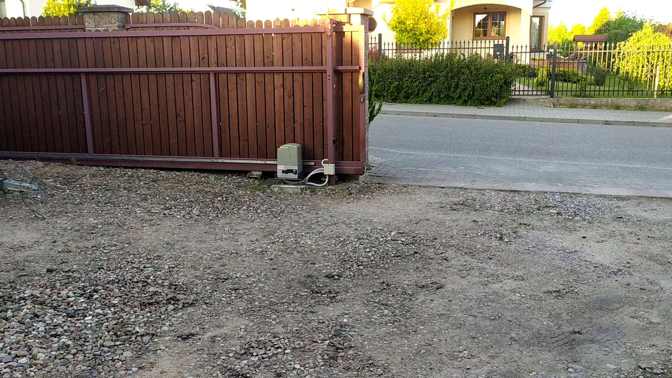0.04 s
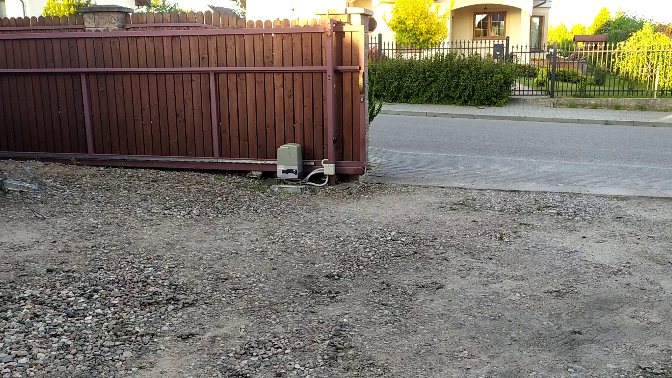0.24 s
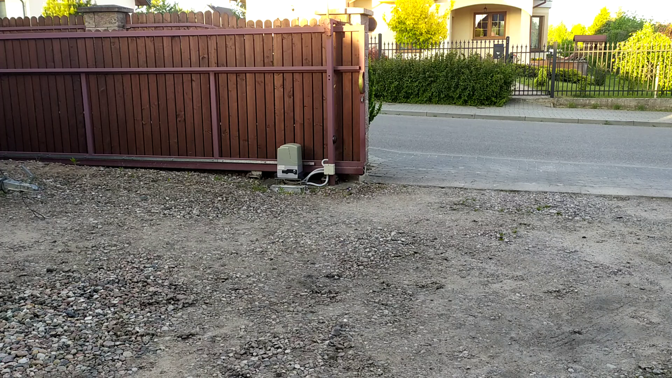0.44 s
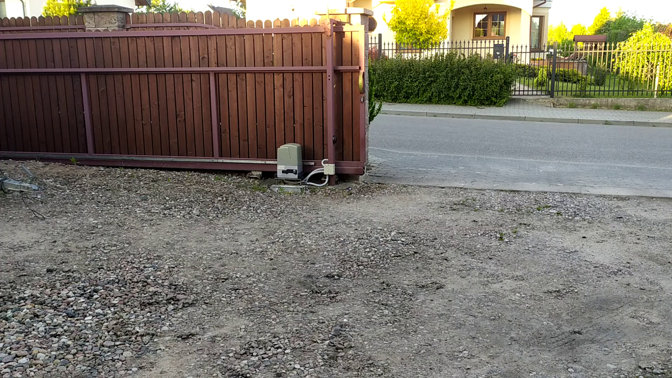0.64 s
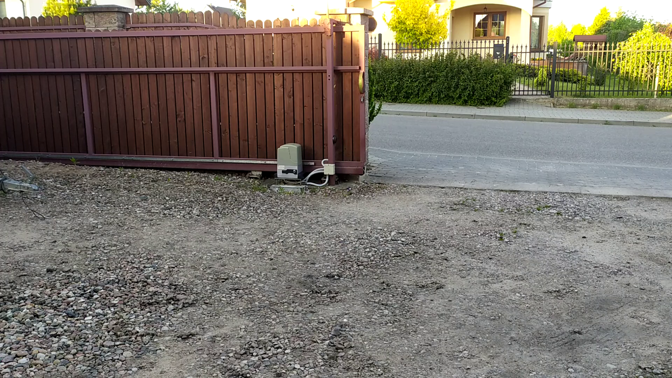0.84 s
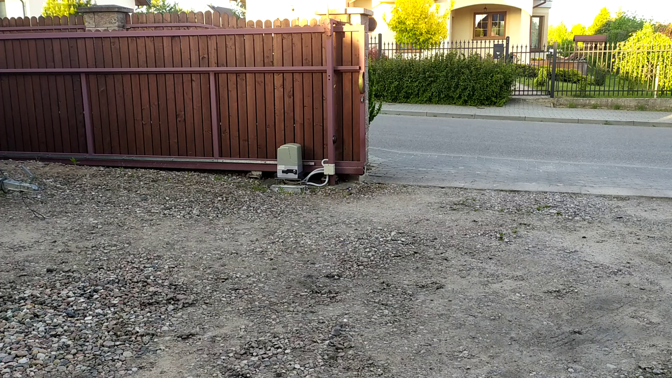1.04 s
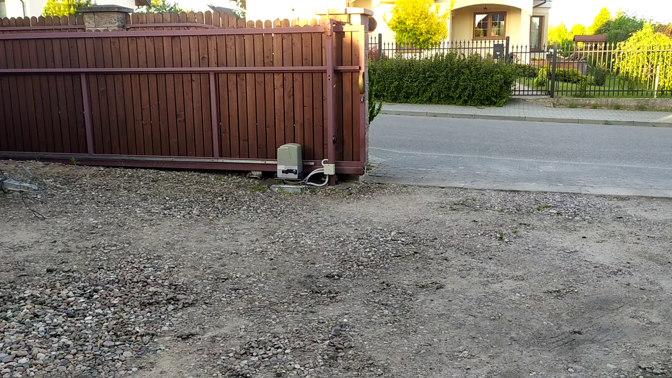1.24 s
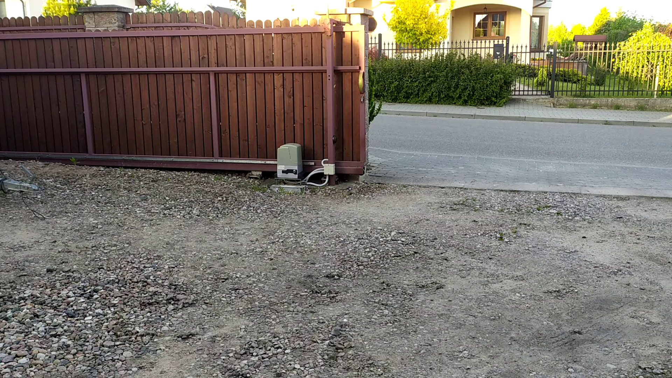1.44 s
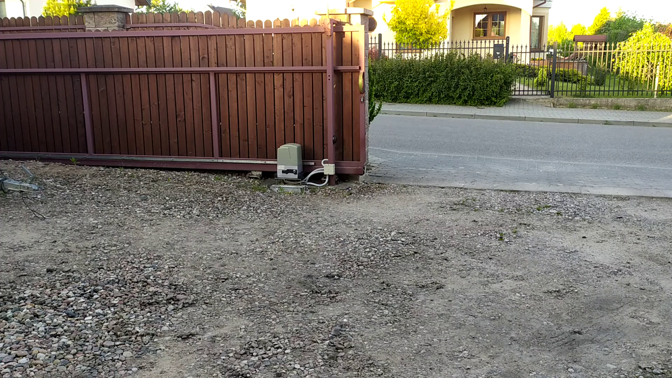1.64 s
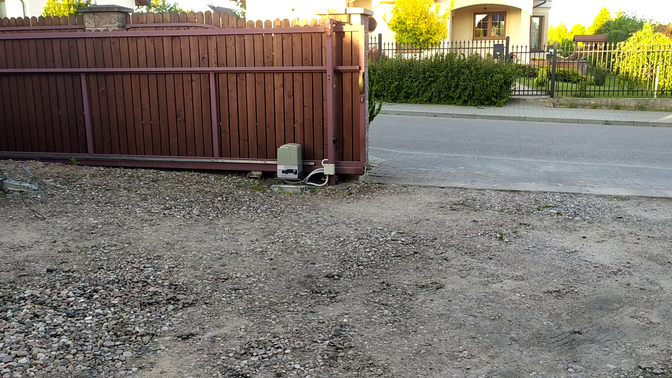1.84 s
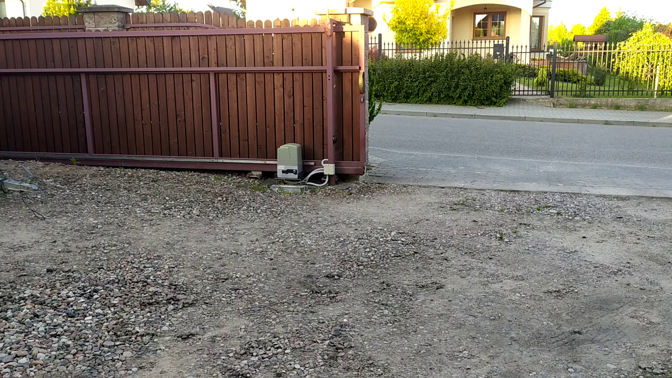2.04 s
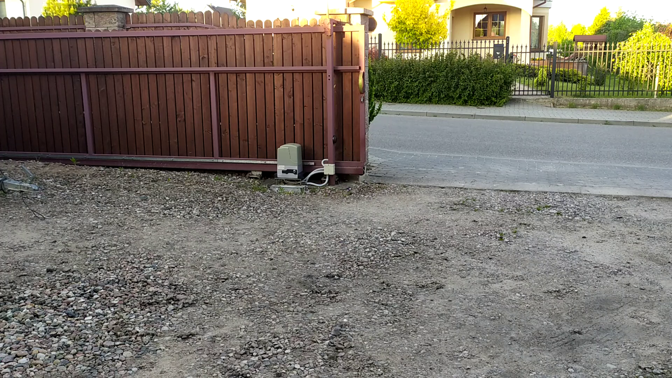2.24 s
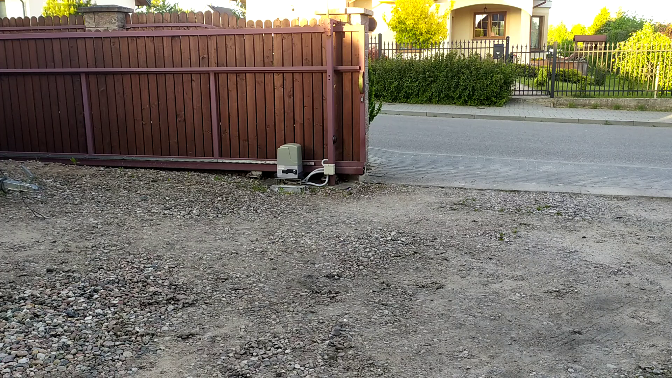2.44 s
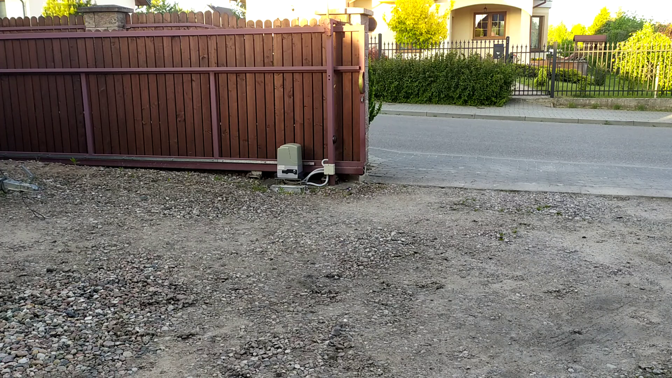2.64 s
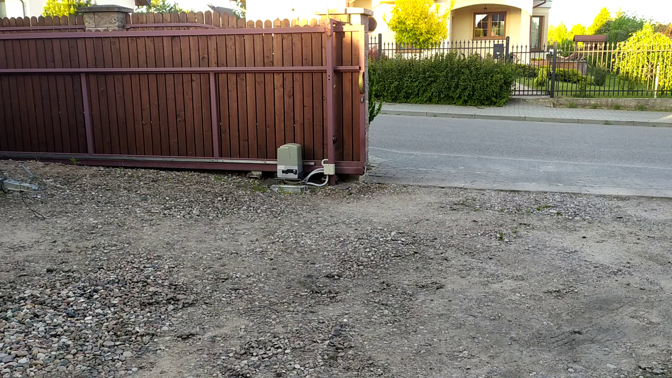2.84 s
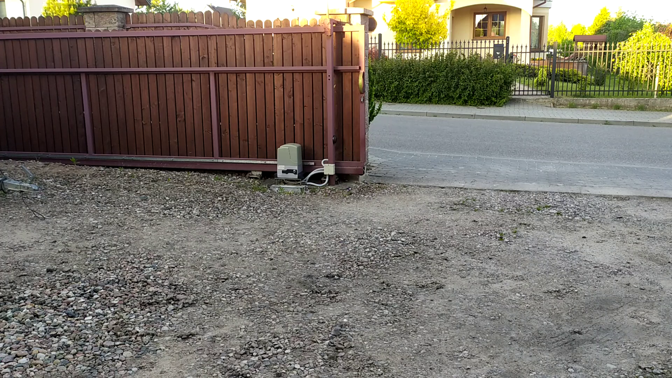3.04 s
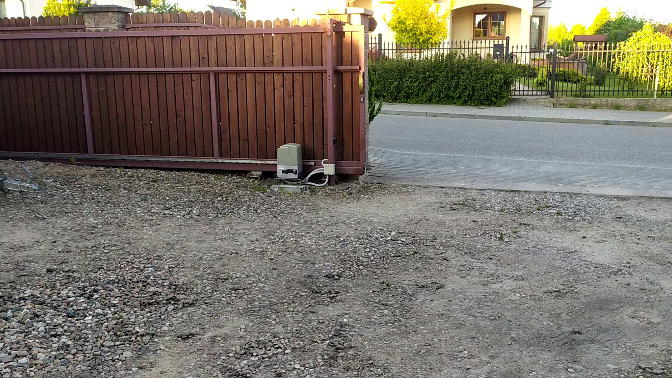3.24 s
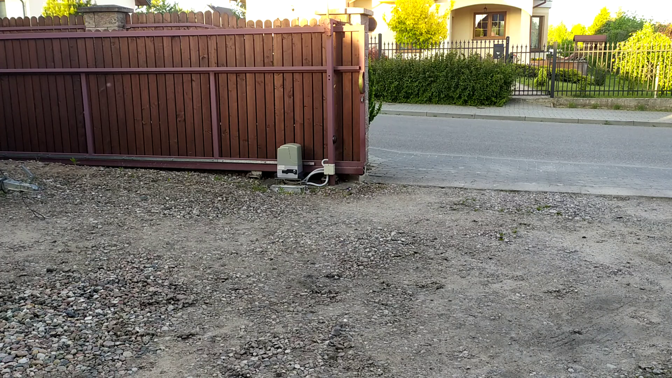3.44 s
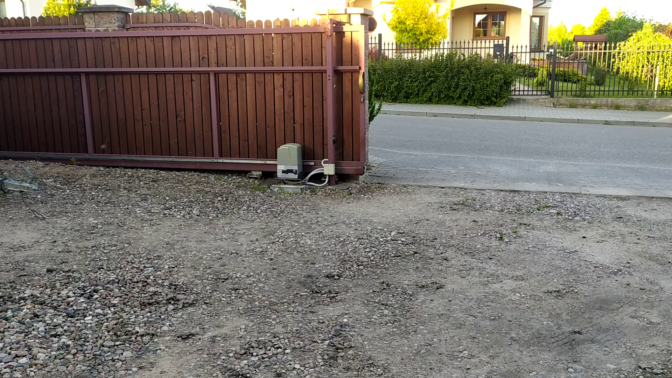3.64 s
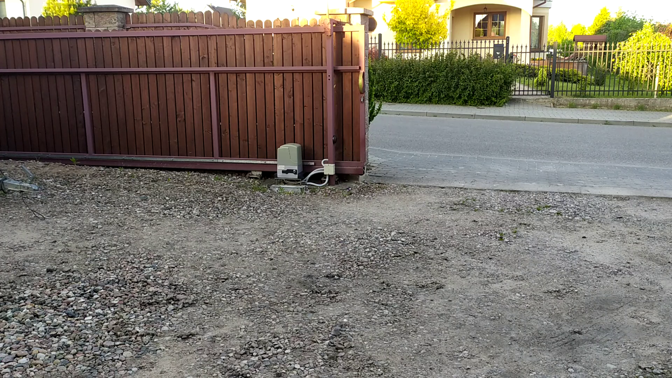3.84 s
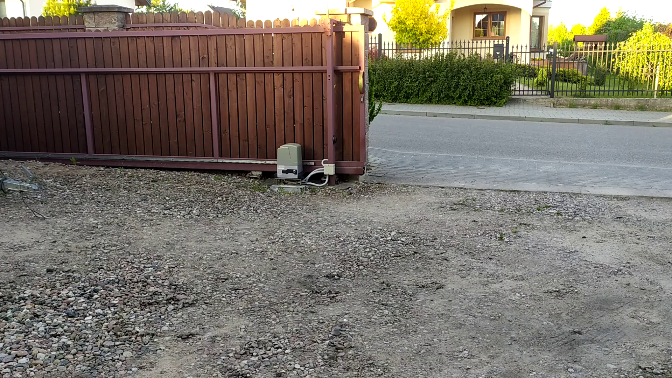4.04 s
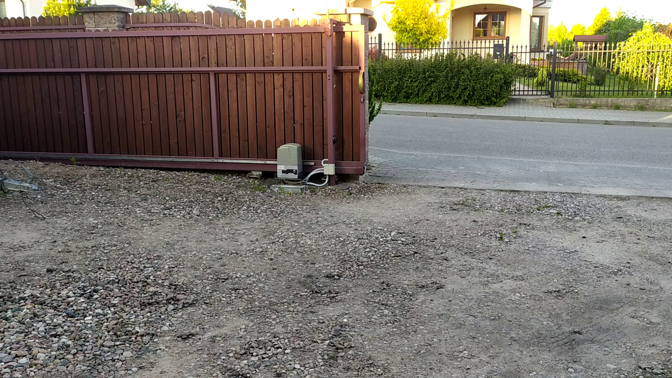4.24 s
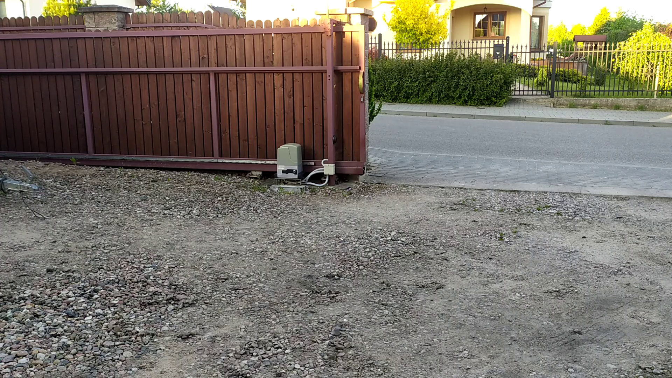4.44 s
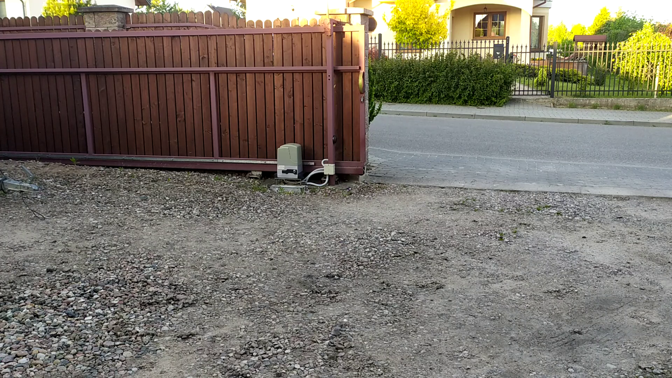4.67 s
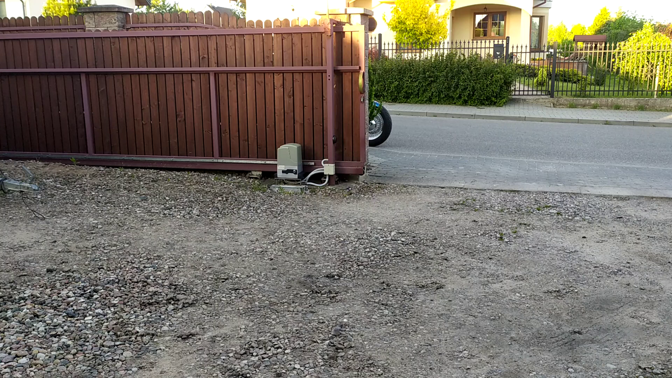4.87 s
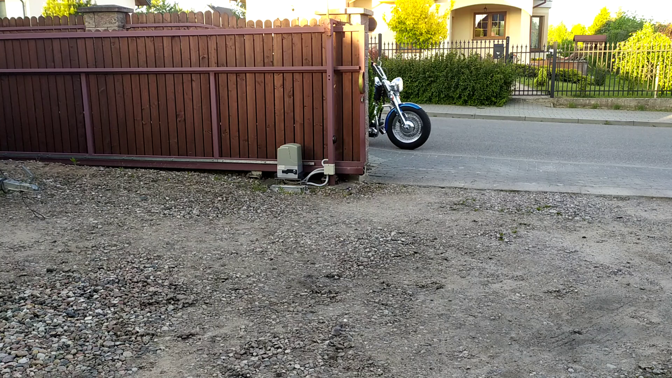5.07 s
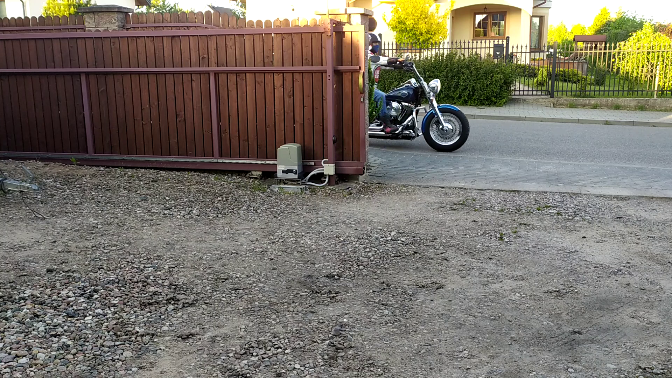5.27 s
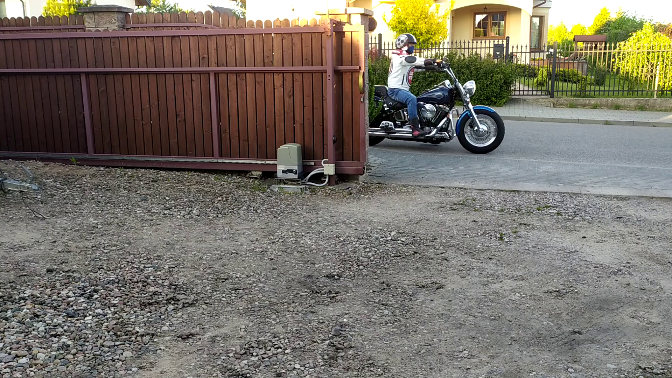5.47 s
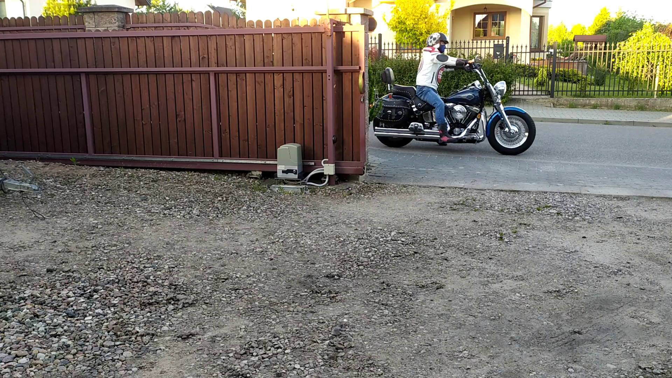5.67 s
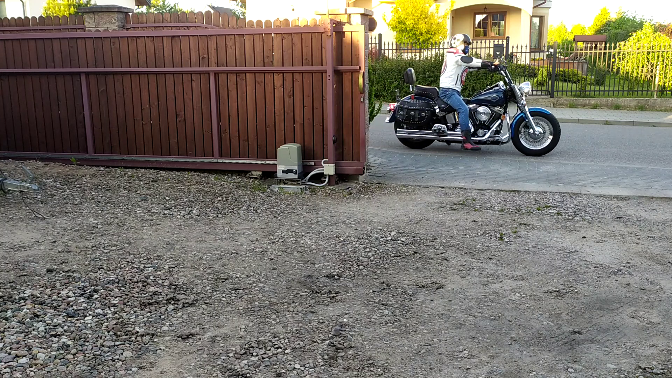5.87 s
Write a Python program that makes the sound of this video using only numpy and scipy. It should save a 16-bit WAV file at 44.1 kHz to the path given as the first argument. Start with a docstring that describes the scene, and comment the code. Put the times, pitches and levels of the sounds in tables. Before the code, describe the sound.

Deep uneven motorcycle idle broken by barking throttle blips and popping exhaust, echoing off houses, getting clearer as the bike passes a fence end.

```python
"""On a street, two microphones by a wooden fence: a V-twin motorcycle with open pipes rolls slowly nearer behind it.
From the first instant the throttle is blipped again and again, with idling between; the pipes boom near 75 Hz.
Each firing thuds through the pipe modes, firings under load crack as pops and torn gas, and house fronts echo it.
At the end the bike clears the fence: its cracks turn dry and central, over fine clatter and the far wash."""
import sys
import numpy as np
from scipy import signal
from scipy.fft import rfft, irfft, next_fast_len
from scipy.io import wavfile
from scipy.ndimage import uniform_filter1d

SR = 44100
rng = np.random.default_rng(int(sys.argv[2]) if len(sys.argv) > 2 else 0)


def wrap_up_sound(samples):
    """Save the sound to the file named by the first command line argument, as 16-bit audio."""
    columns = np.atleast_2d(samples).T
    # keep every value between -1 and 1, then stretch to whole-number steps
    tamed = np.clip(columns, -1, 1)
    steps = np.round(tamed * 32767).astype(np.int16)
    wavfile.write(sys.argv[1], SR, steps)


def invert_db(x):
    """Field ratio 10**(x/20) for x, a level in decibels (scalar or array-like)."""
    u = np.asarray(x, float) / 20
    return 10 ** u


N = 260631
T = np.arange(N) / SR
CLEAR_S = 4.7  # from here the bike is heard past the end of the fence


def evened(x):
    """Scales to rms 1."""
    return x / np.sqrt(np.mean(x ** 2) + 1e-20)


def levelled(x, span_s):
    """Divides out the slow level, so that a curve can set it."""
    return x / np.sqrt(uniform_filter1d(x ** 2, round(span_s * SR)).clip(1e-12))


def drift(span):
    """Slow random wander of rms 1: noise averaged over a span of samples."""
    return evened(uniform_filter1d(rng.standard_normal(N), span))


def read(points, hz):
    """Reads a spectrum on a log-frequency axis."""
    f, value = np.transpose(points)
    return np.interp(np.log(hz + 1), np.log(f + 1), value)


def curves(rows):
    """Every column of a table at the sample rate."""
    s, *columns = np.transpose(rows)
    return [np.interp(T, s, c) for c in columns]


def colour(x, points):
    """Filters by a spectrum in dB."""
    size = next_fast_len(x.shape[-1])
    gain = invert_db(read(points, np.fft.rfftfreq(size, 1 / SR)))
    return irfft(rfft(x, size) * gain, size)[..., :x.shape[-1]]


def ring(x, modes):
    """Sums resonances; each is applied twice, so it swells in and its skirts are steep."""
    out = 0
    for hz, width, db in modes:
        pole = [1, -np.exp((2j * np.pi * hz - np.pi * width) / SR)]
        once = signal.lfilter([1], pole, x + 0j)
        out = out + invert_db(db) * evened(signal.lfilter([1], pole, once).real)
    return out


# far wash at the microphones, relative density: pitch_hz, level_db [dB per Hz]
AIR_SPECTRUM = [(180, -27), (300, -2.5), (452, -7), (597, 0), (1250, -20.5), (1470, -13.5), (8190, -26),
                (11000, -32), (15000, -81.5)]


def air(mean_db=-55.5, swell_db=3.1):
    """The far wash of the neighbourhood: coloured noise, gently swelling."""
    swell = drift(6000)
    return invert_db(mean_db + swell_db * swell) * evened(colour(rng.standard_normal((2, N)), AIR_SPECTRUM))


# engine clatter, relative density: pitch_hz, level_db [dB per Hz]
CLATTER_SPECTRUM = [(700, -9.5), (1500, 8), (3000, -20), (8000, -1.5), (11000, -10), (15000, -22.5)]
# clatter at the microphones as the bike nears: start_s, level_db
CLATTER_LEVEL = [(0, -85), (3.999, -64), (4.6, -64), (5.3, -59), (5.91, -57)]


def clatter(per_s=1500, spread_db=4):
    """Valve gear and chain tick finely: sparse random clicks, louder as the bike nears the end of the fence."""
    struck = rng.random((2, N)) < per_s / SR
    ticks = struck * rng.standard_normal((2, N))
    ticks = ticks * invert_db(spread_db * np.minimum(rng.exponential(1, (2, N)), 3))
    ticks = colour(ticks + 0.5 * ticks[::-1], CLATTER_SPECTRUM)  # part of each tick reaches both microphones
    return invert_db(curves(CLATTER_LEVEL)[0]) * evened(ticks)


# how long the house fronts ring: pitch_hz, t60_s
STREET_T60 = [(150, 1), (400, 0.51), (1000, 0.94), (2800, 0.81), (7300, 0.71), (14000, 0.32)]


def street(x, like_hz=700, shift_hz=1.3):
    """Sparse echoes of random sign die band by band; the pattern shifts, both microphones share the bass."""
    taps = np.zeros((2, 2, SR))  # echo pattern, microphone, sample
    at = np.arange(200, SR - 20, 20) + rng.integers(0, 20, (2, 2, (SR - 201) // 20))
    np.put_along_axis(taps, at, rng.choice([-1., 1.], at.shape), 2)
    hz, t, z = signal.stft(taps, SR, nperseg=512)
    same = 1 / (1 + (hz[:, None] / like_hz) ** 2)
    z[:, 1] = same * z[:, 0] + np.sqrt(1 - same ** 2) * z[:, 1]
    decay = invert_db(-60 * t / read(STREET_T60, hz)[:, None])
    tails = signal.istft(z * decay, SR, nperseg=512)[1]
    turn = 2 * np.pi * shift_hz * T
    fed = x * np.array([np.sin(turn), np.cos(turn)])  # the rolling bike feeds the two patterns in turn
    return signal.fftconvolve(fed[:, None], tails / np.linalg.norm(tails[0, 0]), axes=2)[..., :N].sum(0)


# path difference to the pair: start_s, left_lag [samples, negative when the left microphone leads]
LEFT_LAG = [(0, 17), (3.6, 19.5), (4.0, 4.5), (5.91, -6.5)]


def microphones(x):
    """The sound reaches the nearer microphone first."""
    return np.array([np.interp(T - curves(LEFT_LAG)[0] / SR, T, x), x])


# crank timing: start_s, firings [count so far]
CRANK_COUNT = [(.0175, 0), (.088, 2), (.464, 12), (.609, 16), (1.329, 34), (1.505, 38), (1.959, 48),
               (2.42, 56), (2.642, 60), (3.075, 68), (3.259, 72), (3.902, 86), (3.982, 88), (4.813, 104),
               (5.049, 108), (5.272, 112), (5.458, 115), (5.87, 120)]


def firing_times(short_gap=315 / 720):
    """Short gap, long gap, as the crank turns; short_gap is the share of the cycle from front to rear cylinder."""
    s, count = np.transpose(CRANK_COUNT)

    def angle(k):
        return k // 2 + k % 2 * short_gap
    return np.interp(angle(np.arange(count[-1] + 1)), angle(count), s)


def firings(uneven_db=3, jitter_s=0.001405):
    """One click a firing, each burn a little different in strength and timing."""
    at = firing_times()
    chance = rng.standard_normal((len(at), 2))
    out = np.zeros(N)
    out[((at + jitter_s * chance[:, 0]) * SR).astype(int)] = invert_db(uneven_db * chance[:, 1])
    return np.convolve(out, np.hanning(40), "same")  # a soft push, not a spike


# throttle blips: start_s, wide_open_s, shut_s, load_db, boom_pitch_hz
THROTTLE_BLIPS = [(-.1, -0.004, 0.074, -14.5, 75.37), (0.431, 0.616, 0.73, -22, 77.17),
                  (1.311, 1.459, 1.6, -23.5, 82.53), (2.424, 2.497, 2.594, -14.5, 75.5),
                  (3.019, 3.279, 3.38, -11.5, 88.36), (3.805, 3.903, 4.06, -11, 80.62),
                  (4.743, 4.916, 5.208, -11, 73.94)]


def throttle(fade_s):
    """One row a blip, 0-1: opens, holds, dies away once shut."""
    opens, wide, shuts = np.transpose(THROTTLE_BLIPS)[:3, :, None]
    return ((T - opens) / (wide - opens)).clip(0, 1) * np.exp(-(T - shuts).clip(0) / fade_s)


def load(idle_db, full_db, share, fade_s):
    """Gain of a layer: its idle, plus what every blip adds (full_db at 0 dB load, share in dB per dB of load)."""
    return invert_db(idle_db) + invert_db(full_db + share * np.transpose(THROTTLE_BLIPS)[3]) @ throttle(fade_s)


UPPER_SHARE, UPPER_FADE_S = 0.72, 0.084  # load response of the upper thuds and the middle ring
CRACK_SHARE = 0.71  # load response of cracks and rasp, dB per dB

# how strongly gas sputters in each blip: level_db [added to that blip]
RASP_BLIPS = [4.5, -4.5, 5, 2.5, 2.5, 1, -2]


def rasp(per_s=99, spread_db=5, puff_s=0.0091, patchy_db=5, full_db=-41.5, fade_s=0.11):
    """Gas sputters out between the cracks in uneven small puffs of changing colour, on into the overrun."""
    kicks = (rng.random(N) < per_s / SR) * invert_db(spread_db * np.minimum(rng.exponential(1, N), 3))
    gate = .4 + evened(signal.lfilter([1], [1, -np.exp(-1 / (puff_s * SR))], kicks))
    gas = rng.standard_normal((3, N))
    gas = gate * (gas[0] + gas[1:])  # one part common to both microphones, one apart
    gas = np.where(T > CLEAR_S, evened(colour(gas, OPEN_SPECTRUM)), evened(colour(gas, FENCE_SPECTRUM)))
    z = signal.stft(gas, nperseg=512, noverlap=384)[2]
    patches = uniform_filter1d(rng.standard_normal(z.shape[1:]), size=5, axis=0)
    patches = evened(uniform_filter1d(patches, size=7, axis=1))
    gas = signal.istft(z * invert_db(patchy_db * patches), nperseg=512, noverlap=384)[1]
    return load(-79.5, full_db + np.array(RASP_BLIPS), CRACK_SHARE, fade_s) * evened(gas[:, :N])


# middle resonance, shifting as the bike rolls past walls and fence: start_s, pitch_hz, idle_level_db
MIDDLE = [(.95, 766, -59), (1.1, 545, -55), (1.8, 535, -49), (2.6, 524, -52.5), (3.1, 543, -51.5),
          (3.2, 333, -46), (3.79, 327, -42.5), (3.85, 736, -59), (4.1, 708, -79), (4.3, 542, -57),
          (4.75, 375, -59), (5.2, 375, -53), (5.91, 385, -47)]
MIDDLE_WIDTH_HZ = 79  # of each of two passes


def mid_ring(fired, blow_s=0.034, waver=0.062, full_db=-41.5):
    """Each firing blows a turbulent gust over the shifting middle resonance: short fluttering tones."""
    hz, idle_db = curves(MIDDLE)
    hz = hz * (1 + waver * drift(2000))
    gust = signal.lfilter([1], [1, -np.exp(-1 / (blow_s * SR))], fired) * rng.standard_normal(N)
    turn = np.exp(2j * np.pi * np.cumsum(hz) / SR)
    pole = [1, -np.exp(-np.pi * MIDDLE_WIDTH_HZ / SR)]
    # shifted down to 0 Hz, smoothed twice, shifted back: a resonance that can glide
    smooth = signal.lfilter([1], pole, signal.lfilter([1], pole, gust / turn))
    tones = levelled((turn * smooth).real, 0.28)
    return load(idle_db, full_db, UPPER_SHARE, UPPER_FADE_S) * microphones(tones)


# the bass sags or swells for a while: centre_s, half_length_s, level_db
BASS_THROBS = [(0.103, 0.032, -20), (0.174, 0.045, 3.5), (0.248, 0.021, -10), (0.44, 0.02, -8.5),
               (0.84, 0.07, 5), (1.523, 0.023, 4.5), (1.988, 0.016, 8.5), (2.652, 0.022, 7.5),
               (2.692, 0.014, -16), (2.86, 0.011, 6), (3.149, 0.03, -15), (3.769, 0.03, -17),
               (4.082, 0.071, -21), (4.367, 0.033, -10), (4.97, 0.041, 4), (5.495, .025, 5.5),
               (5.577, .025, 5.5)]
# the bass breaks off for an instant, mostly where a new firing cuts across it: centre_s, level_db
BASS_BREAKS = [(0.051, -10), (.5, -7), (0.607, -14), (.648, -8), (0.906, -23), (1.028, -3), (1.072, -6),
               (1.178, -4), (1.236, 0), (1.625, -12), (1.74, -3.5), (1.882, -11), (1.972, -6), (2.265, -18),
               (2.616, -26), (2.713, -11), (2.985, -13), (3.066, -10), (3.348, -14), (3.408, -30),
               (3.54, -13), (4.28, -5), (4.525, -12.5), (4.665, -11.5), (5.049, -3.5), (5.096, -11),
               (5.152, -10), (5.219, -15), (5.418, -21), (5.53, -6), (5.62, -14), (5.788, -9.5)]


def throbs(break_s=0.011):
    """Sags, swells and breaks of the bass, in dB; break_s is half a break's length."""
    slow = sum(db * np.exp(-((T - s) / length_s) ** 2) for s, length_s, db in BASS_THROBS)
    at, db = np.transpose(BASS_BREAKS)
    marks = np.zeros(N)
    marks[(at * SR).astype(int)] = db
    dip = np.exp(-(np.arange(-2000, 2001) / SR / break_s) ** 2)
    return slow + signal.oaconvolve(marks, dip, "same")


# idling as the bike draws near: start_s, boom_level_db, boom_pitch_hz, thud_level_db, upper_thud_level_db
IDLING = [(0, -24, 65.12, -34.5, -50), (1, -24.5, 74.07, -26.5, -49.5), (2.2, -23, 69.62, -29.5, -53.5),
          (2.9, -19, 71.8, -24, -47), (3.65, -20.5, 69.85, -23, -44.5), (4.3, -15, 69.42, -20.5, -44),
          (4.65, -15, 71.05, -27.5, -51), (5.4, -19, 73.6, -36, -49.5), (5.91, -14.5, 71.16, -24.5, -40)]
# higher pipe modes, low then high: pitch_hz, width_hz [of each of two passes], level_db [relative]
LOW_PIPE_MODES = [(110, 83, 6), (159.5, 78, 4), (205, 36.3, -2), (239.8, 16.3, -8), (304, 74, -19.5)]
HIGH_PIPE_MODES = [(371.6, 240, 9.5), (510, 180, 0.5), (641, 17.6, -7), (776.6, 60, -5), (1034, 300, -7)]
# how throaty each blip comes out: level_db [added to the upper thuds of that blip]
BARK = [1, 7, 7, 6, 1.5, -3.5, -2.5]


def thuds(fired):
    """Firings ring the higher pipe modes; most of the upper part arrives by way of the walls."""
    low_db, upper_db = curves(IDLING)[2:]
    low_gain = load(low_db, -10, 0.61, 0.14) * invert_db(0.29 * throbs())
    upper_gain = load(upper_db, -31 + np.array(BARK), UPPER_SHARE, UPPER_FADE_S)
    out = 0
    # push in samples: the low modes feel a slower one
    for modes, push, gain, wet_db in ((LOW_PIPE_MODES, 260, low_gain, 1.5),
                                      (HIGH_PIPE_MODES, 50, upper_gain, 12)):
        direct = ring(np.convolve(fired, np.hanning(push), "same"), modes)
        both = microphones(direct) + invert_db(wet_db) * street(direct)
        power = uniform_filter1d((both ** 2).mean(0), round(.15 * SR))
        out = out + gain * both / np.sqrt(power.clip(1e-12))
    return out


# single pipe modes that hoot briefly: centre_s, half_length_s, pitch_hz, level_db
PIPE_HOOTS = [(3.928, 0.033, 304.5, -20), (4.029, 0.17, 203, -18.5), (4.462, 0.039, 205, -22),
              (4.746, 0.018, 201.6, -18.5), (5.195, 0.05, 199.9, -18.5), (5.451, 0.0554, 196.8, -20.5),
              (2.646, 0.015, 540, -25.5), (3.297, 0.018, 333.4, -25.5), (3.397, 0.018, 390, -29),
              (5.051, 0.008, 670.4, -26), (5.052, 0.013, 277, -18), (5.783, 0.013, 735, -37.5)]


def hoots():
    """Single pipe modes speak for a moment, each sliding up into its pitch."""
    out = np.zeros(N)
    for s, length_s, hz, db in PIPE_HOOTS:
        u = (T - s) / length_s
        slide = hz * (1 - 0.5 * np.exp(-3.5 * (u + 1).clip(0)))
        out += invert_db(db) * np.exp(-u ** 2) * np.sin(2 * np.pi * np.cumsum(slide) / SR)
    return out


def boom(fired, waver_hz=1.8, full_db=-3.5, fade_s=0.14, pitch_sag_s=0.12):
    """A near tone at the pipe's lowest resonance, pulled by each blip, beside the ringing firings kick off."""
    idle_db, idle_hz = curves(IDLING)[:2]
    pull = np.transpose(THROTTLE_BLIPS)[4, :, None] - idle_hz
    hz = idle_hz + (pull * throttle(pitch_sag_s)).sum(0)
    hz = hz + waver_hz * drift(4000)
    tone = np.sqrt(2) * np.sin(2 * np.pi * np.cumsum(hz) / SR)
    kicks = levelled(ring(fired, [(75.5, 36.0, 0)]), 0.24) * invert_db(-13)
    kicks = (1 - 0.64 * throttle(fade_s).max(0)) * kicks  # the tone takes over under load
    gain = load(idle_db, full_db, 1, fade_s) * invert_db(throbs())
    return microphones(gain * (tone + kicks) + hoots())


# idle crackle, clearer near the fence end: start_s, level_db [before cracks() takes off 5 dB]
IDLE_CRACKLE = [(0, -44), (2.3, -64), (3.5, -50.5), (4.4, -58.5), (5.25, -40.5), (5.91, -42.5)]


def plain_cracks(uneven_db=3):
    """All other firings crack as hard as the throttle loads them; rows like those of LOUD_CRACKS."""
    s = firing_times()
    levels = []
    for idle_db, full_db in ((curves(IDLE_CRACKLE)[0], -34.5), (-63, -35)):  # crack, then pop
        gain = load(idle_db, full_db, CRACK_SHARE, 0.04)
        levels.append(20 * np.log10(gain[(s * SR).astype(int)]))
    rows = np.c_[s, np.transpose(levels) + uneven_db * rng.standard_normal((len(s), 2))]
    return rows[abs(s[:, None] - np.transpose(LOUD_CRACKS)[0]).min(1) > .018]


# treble resonance of the cracks, shifting as the bike rolls: start_s, pitch_hz, level_db
TREBLE_BITE = [(.05, 2580, 2.5), (1.5, 2680, 2), (2.55, 2780, 4), (3.2, 4570, 0), (3.3, 5500, 6),
               (3.95, 5900, -1.5), (4.87, 3510, 6.5), (5.05, 3410, 5), (5.8, 2800, 0)]
# brightness of the cracks: start_s, tilt_db [per octave]
BRIGHTNESS = [(0, -1), (2.5, 0), (4, 2), (4.7, 0.5), (5.91, -2)]


def blast_tint(s):
    """Spectrum of one blast: chance, treble resonance and tilt, so no two have the same colour."""
    chance = rng.random(18)
    hz = np.geomspace(1000, 12000, len(chance))
    start_s, *columns = np.transpose(TREBLE_BITE)
    bite_hz, bite_db = (np.interp(s, start_s, c) for c in columns)
    bite = bite_db * np.exp(-(np.log2(hz / bite_hz) / 0.24) ** 2)
    tilt = np.interp(s, *np.transpose(BRIGHTNESS)) * np.log2(hz / 3000)
    return np.c_[hz, 8 * (chance - .5) + bite + tilt]


# firings that stand out: start_s, crack_level_db [before 5 dB is taken off], pop_level_db [peak]
LOUD_CRACKS = [(.003, -30, -33), (.05, -26, -41), (0.087, -30, -33), (0.116, -28.5, -33),
               (0.4988, -32, -55), (.5403, -31.5, -31.5), (0.5708, -27.5, -27.5), (0.609, -29, -39),
               (0.6378, -30, -41.5), (1.37, -36.5, -33), (1.418, -34.5, -24), (1.5045, -31.5, -30.5),
               (1.5395, -27.5, -22.5), (1.7494, -61, -33.5), (1.8594, -55, -36.5), (1.9564, -51, -37.5),
               (2.0684, -48.5, -38.5), (2.208, -56, -40.5), (2.4186, -39, -30), (2.4745, -25.5, -17),
               (2.536, -24, -21.5), (2.589, -27, -31.5), (2.6414, -29.5, -19.5), (2.6889, -34.5, -40),
               (3.0024, -42.5, -31.5), (3.0742, -49, -34), (3.167, -39.5, -35), (3.212, -34, -41),
               (3.259, -28, -19.5), (3.295, -27.5, -38), (3.3477, -33.5, -42), (3.8482, -26.5, -20),
               (3.9039, -23, -16.5), (3.9344, -25.5, -22.5), (4.7305, -45.5, -60), (3.9816, -30, -34),
               (4.812, -36.5, -32.5), (4.8713, -19.5, -16), (4.9378, -27.5, -32), (4.9925, -24.5, -17),
               (5.006, -24.5, -23.5), (5.0484, -16.5, -23.5), (5.1606, -32, -52), (5.458, -31, -28),
               (5.539, -36, -49.5), (5.6122, -36, -57), (5.7766, -30.5, -32.5), (5.8701, -27.5, -33)]
# cracks heard round the fence, relative density: pitch_hz, level_db [dB per Hz]
FENCE_SPECTRUM = [(530, -15), (900, -4), (1640, -2.5), (2230, -1.5), (2790, -7), (3400, -6.5), (8630, -12),
                  (13800, -32), (15000, -47.5)]
# cracks heard in the open, relative density: pitch_hz, level_db [dB per Hz]
OPEN_SPECTRUM = [(530, -37), (900, -2), (1240, -7), (2600, -5.5), (4400, -10.5), (5300, -3.5), (6200, -5),
                 (7000, -7.5), (9480, -9.5), (15000, -26)]
# echo against direct crack, strongest in the last blip, then mostly drier: start_s, level_db [added to the send]
ECHO_LEVEL = [(0, -3), (2.5, 0), (4, 2), (4.9, 3.5), (5.2, -8.5), (5.45, -3), (5.91, -9)]


def cracks(echo_db=-11.5, echo_per_db=-0.27, mid_pop_db=-3):
    """Each is a pop in the pipe, a snap and a puff of gas; the street draws them out into a rasp."""
    size = 6000
    direct, send, t = np.zeros((2, N + size)), np.zeros(N + size), np.arange(size) / SR
    for s, db, pop_db in np.r_[LOUD_CRACKS, plain_cracks()]:
        clear = int(s > CLEAR_S)
        tail = invert_db(-5.5) * np.exp(-t / (.025, .022)[clear])
        shape = (1 - np.exp(-t / 0.0034)) * (np.exp(-t / 0.0052) + tail)
        puff = rng.standard_normal((3, size))
        grains_db = 2.5 * rng.exponential(1, 150).clip(0, 3)
        puff = puff * invert_db(np.repeat(grains_db, 40))  # the gas tears in grains of about a millisecond
        gas = colour(puff[0] + 0.96 * puff[1:], (FENCE_SPECTRUM, OPEN_SPECTRUM)[clear])
        pair = shape * evened(colour(gas, blast_tint(s))) * invert_db(db - 5.0)
        middle = (np.interp(s, *np.transpose(MIDDLE)[:2]), MIDDLE_WIDTH_HZ, mid_pop_db)
        pop = ring(puff[0] * np.exp(-t / 0.0035), HIGH_PIPE_MODES + [middle])
        pair = pair + invert_db(pop_db) * pop / abs(pop).max()
        pair[0] = np.roll(pair[0], round(np.interp(s, *np.transpose(LEFT_LAG))))
        at = round((s - .003) * SR)
        direct[:, at:at + size] += pair
        # weak cracks arrive mostly as echo
        wet_db = echo_db + echo_per_db * max(db, -40) + np.interp(s, *np.transpose(ECHO_LEVEL))
        send[at:at + size] += pair[1] * invert_db(wet_db)
    return direct[:, :N] + invert_db(2.5) * street(send[:N])


def scene():
    """Everything at the two microphones: bass a shade to the left, cracks a shade to the right."""
    fired = firings()
    bass = invert_db(np.array([[.35], [-.35]])) * (boom(fired) + thuds(fired) + mid_ring(fired))
    treble = invert_db(np.array([[-.7], [.7]])) * (cracks() + rasp())
    return bass + treble + air() + clatter()


def low_pass(x):
    """Removes everything above the highest recorded frequency."""
    return signal.sosfilt(signal.butter(12, 15570, fs=SR, output="sos"), x)


def record(dry):
    """The microphones cut the deep bass, the input rounds off the tallest peaks."""
    cut_hz, top = 52, .8  # top: the amplitude that peaks approach
    lean = signal.sosfilt(signal.butter(5, cut_hz, "high", fs=SR, output="sos"), dry)
    lean = lean / (1 + abs(lean / top) ** 4) ** .25
    return low_pass(lean)


dry = scene()
out = record(dry)
wrap_up_sound(out)
```